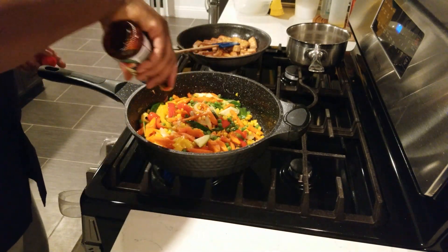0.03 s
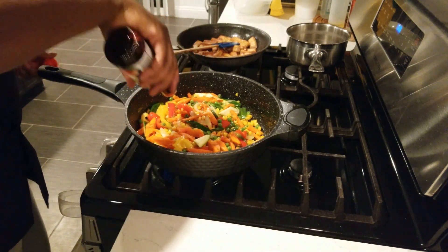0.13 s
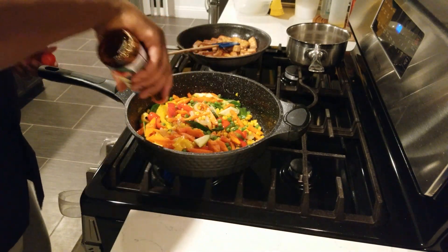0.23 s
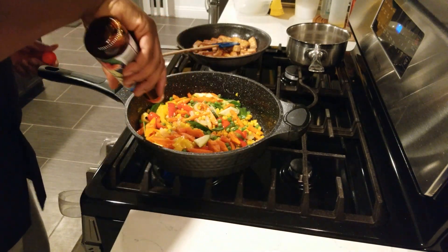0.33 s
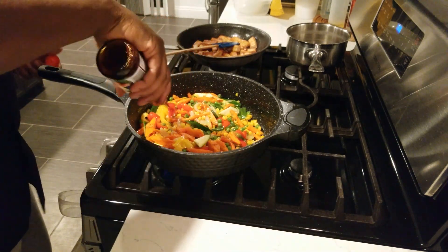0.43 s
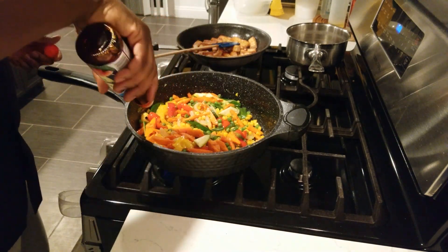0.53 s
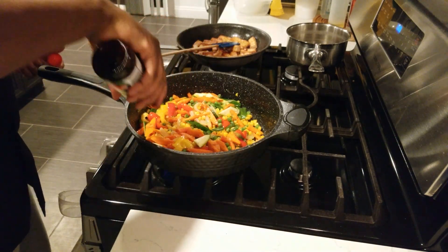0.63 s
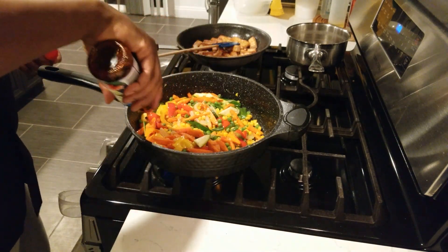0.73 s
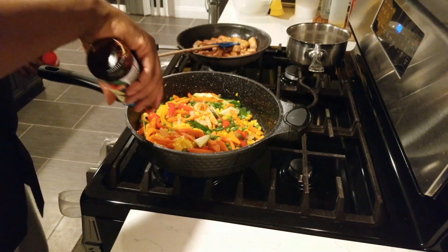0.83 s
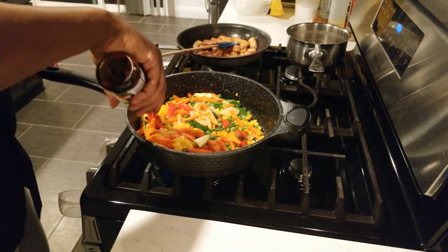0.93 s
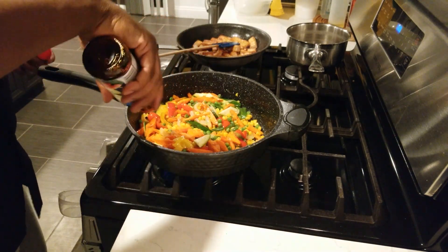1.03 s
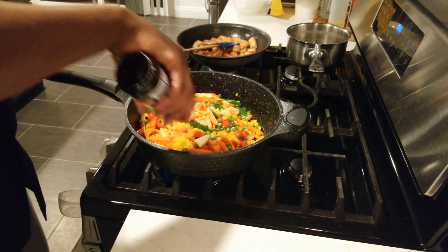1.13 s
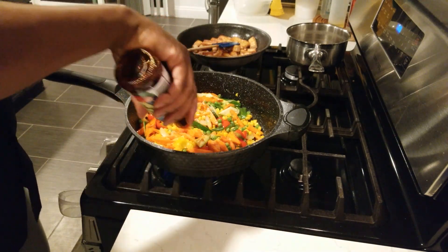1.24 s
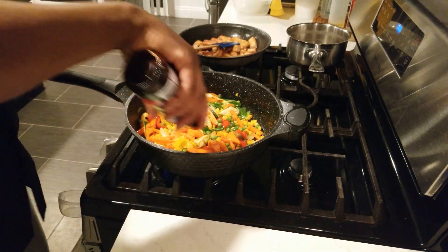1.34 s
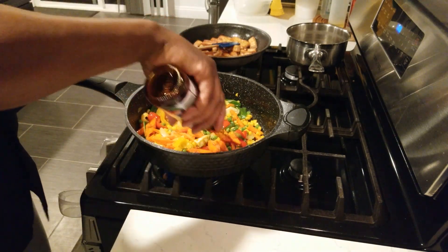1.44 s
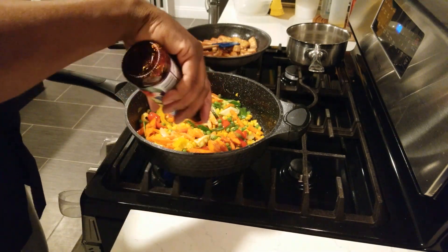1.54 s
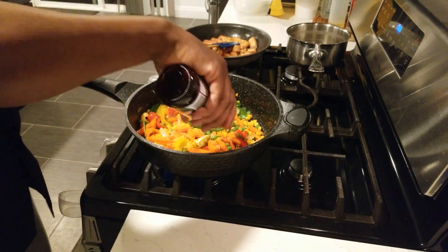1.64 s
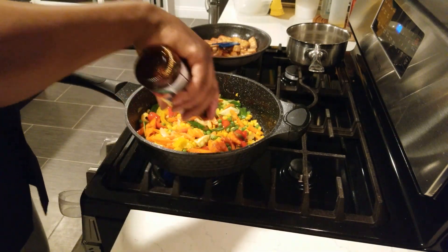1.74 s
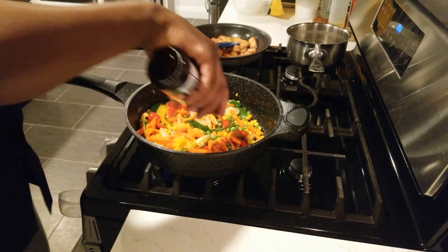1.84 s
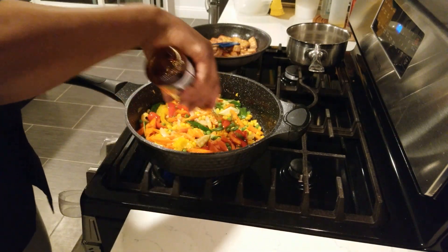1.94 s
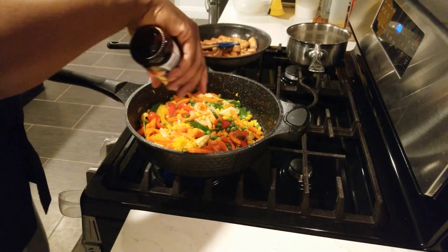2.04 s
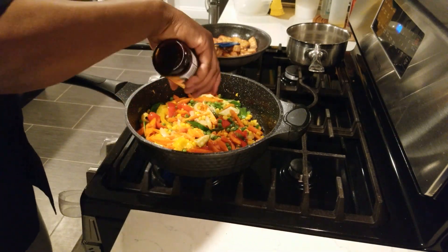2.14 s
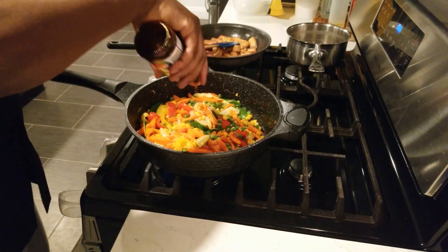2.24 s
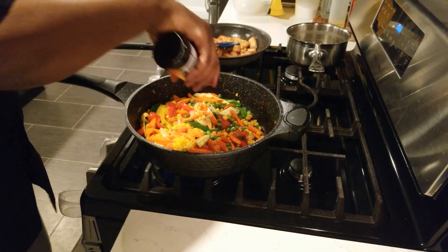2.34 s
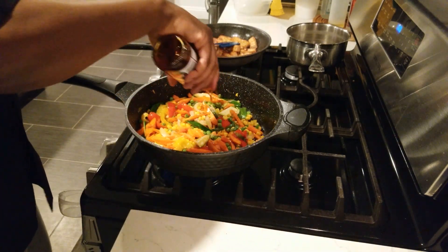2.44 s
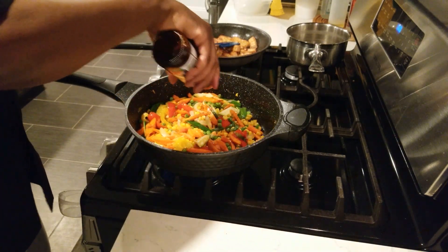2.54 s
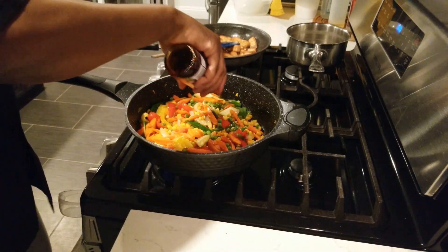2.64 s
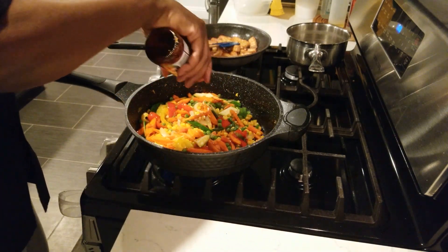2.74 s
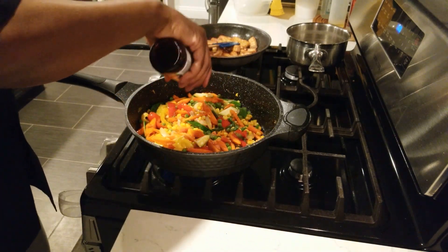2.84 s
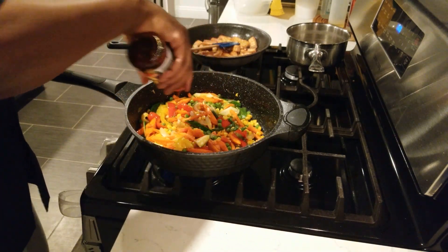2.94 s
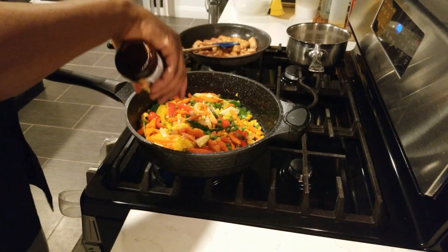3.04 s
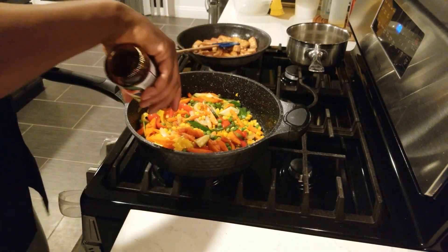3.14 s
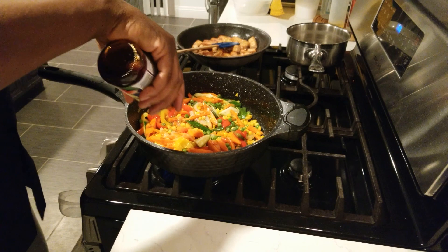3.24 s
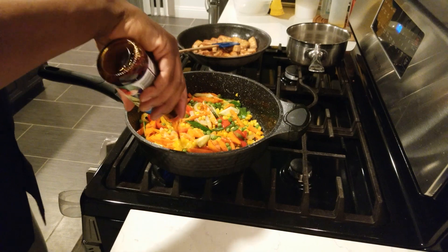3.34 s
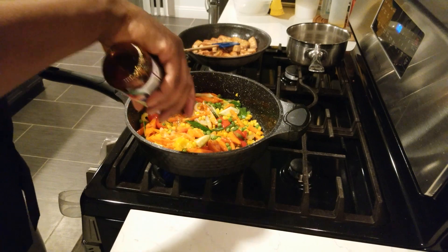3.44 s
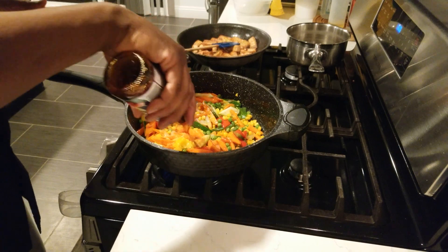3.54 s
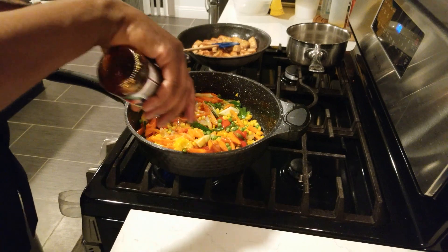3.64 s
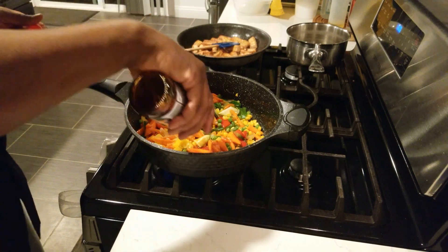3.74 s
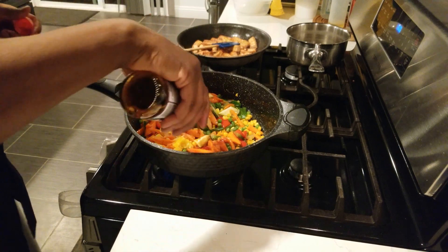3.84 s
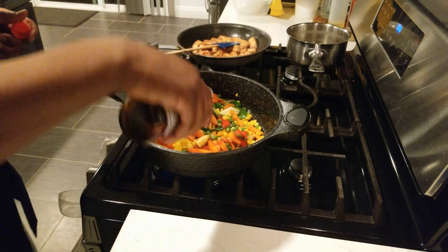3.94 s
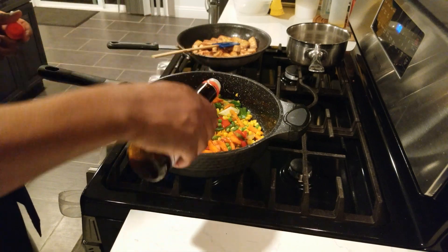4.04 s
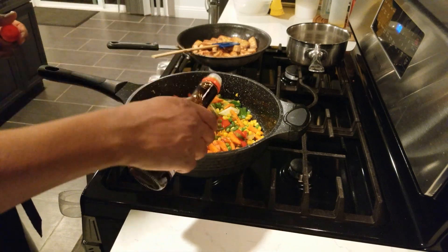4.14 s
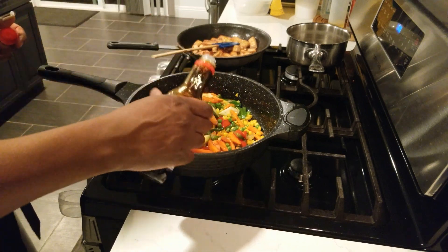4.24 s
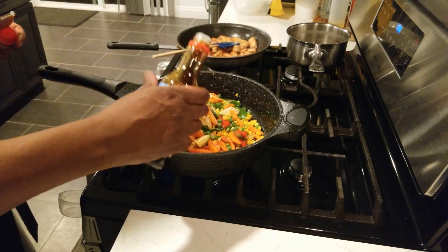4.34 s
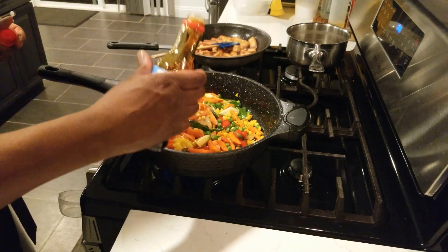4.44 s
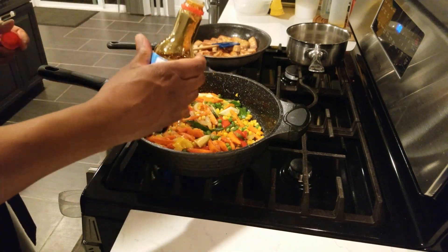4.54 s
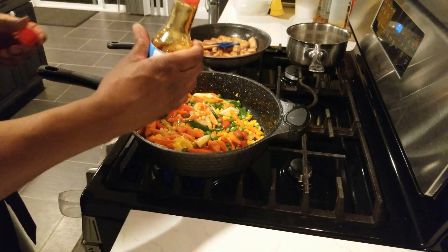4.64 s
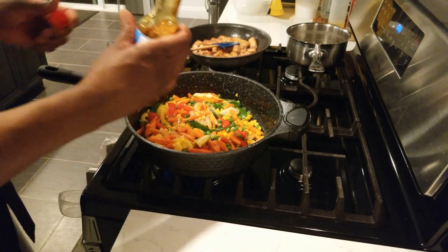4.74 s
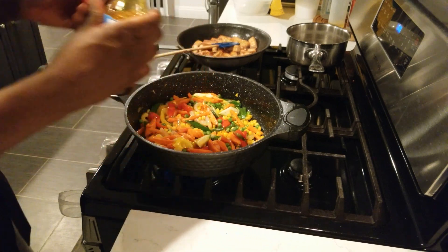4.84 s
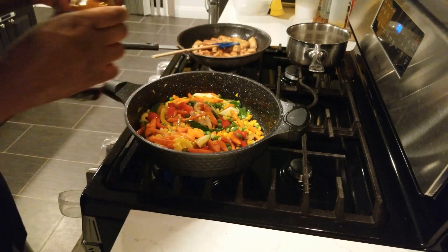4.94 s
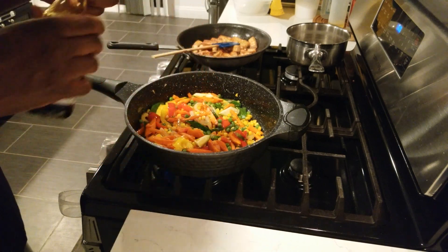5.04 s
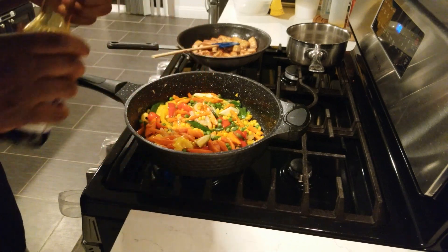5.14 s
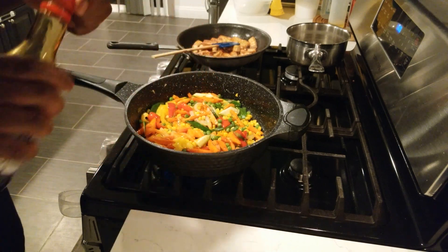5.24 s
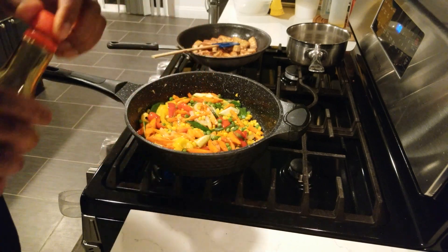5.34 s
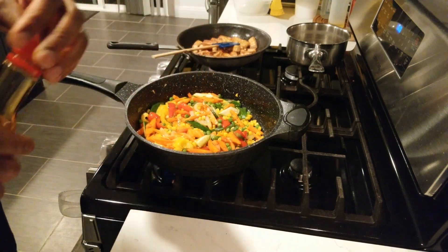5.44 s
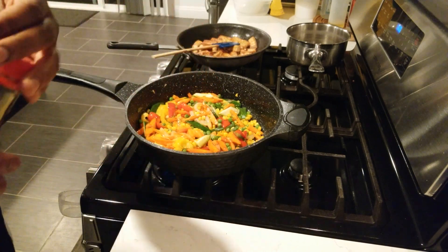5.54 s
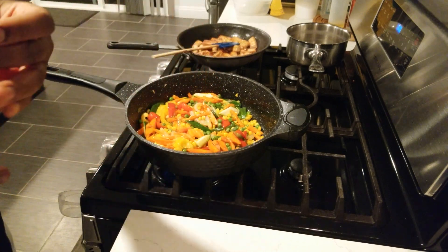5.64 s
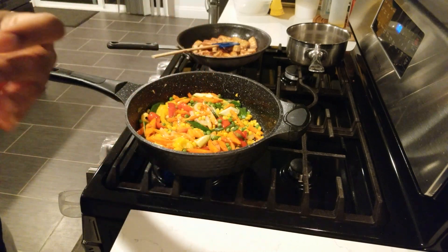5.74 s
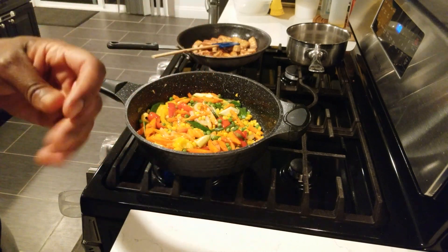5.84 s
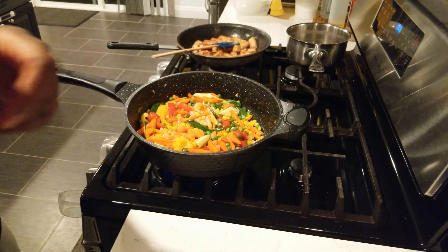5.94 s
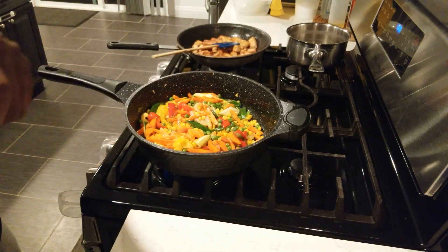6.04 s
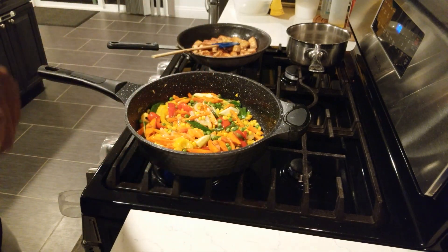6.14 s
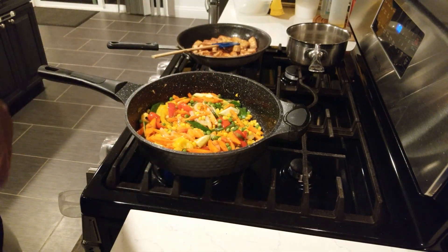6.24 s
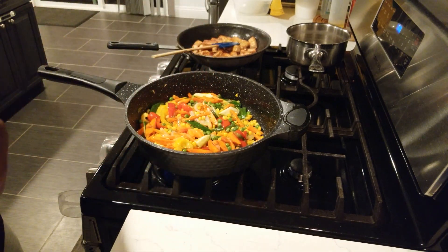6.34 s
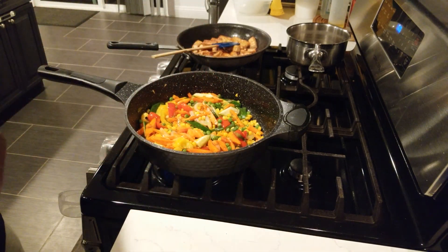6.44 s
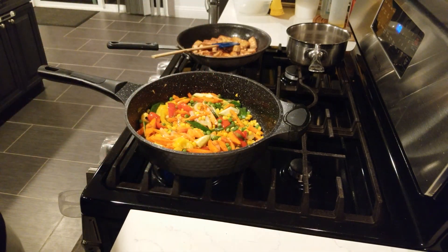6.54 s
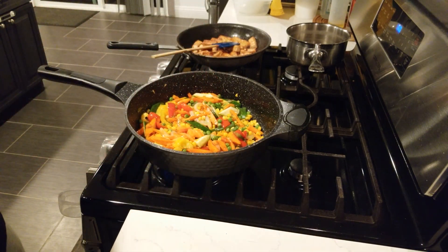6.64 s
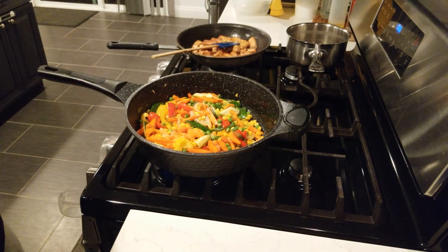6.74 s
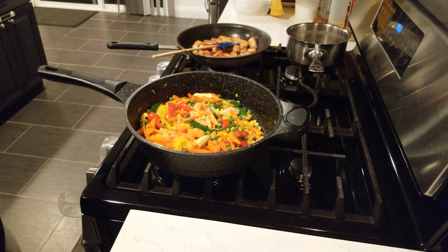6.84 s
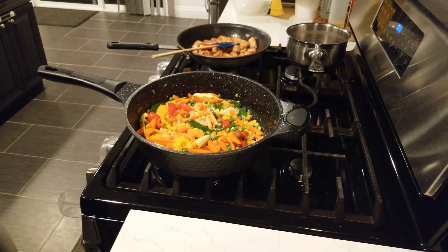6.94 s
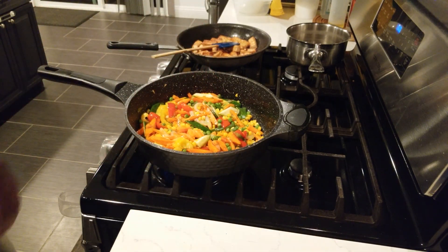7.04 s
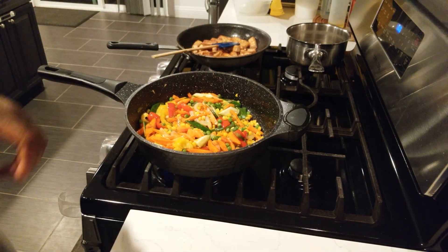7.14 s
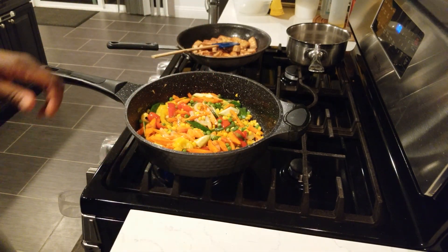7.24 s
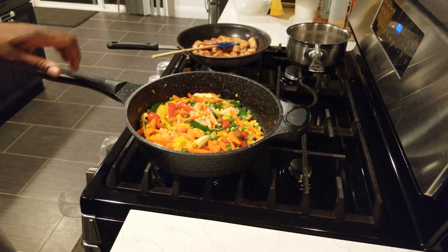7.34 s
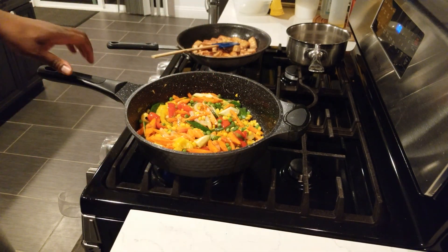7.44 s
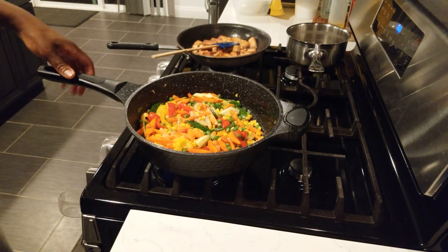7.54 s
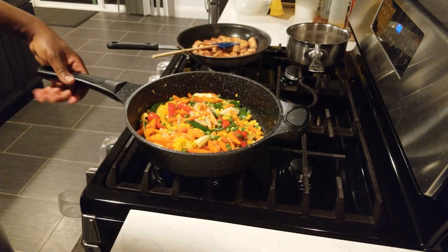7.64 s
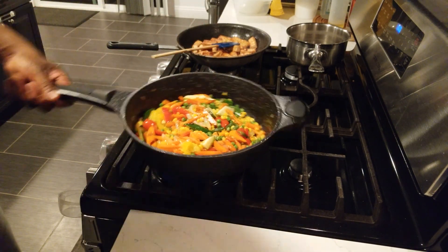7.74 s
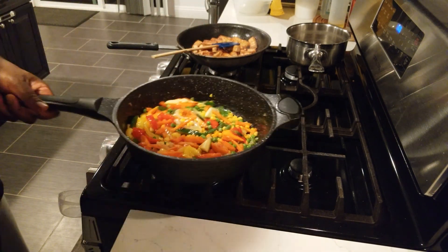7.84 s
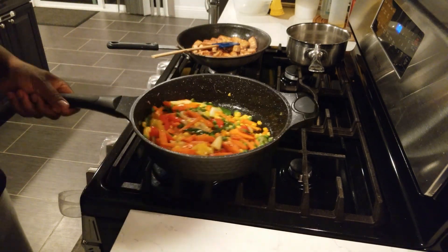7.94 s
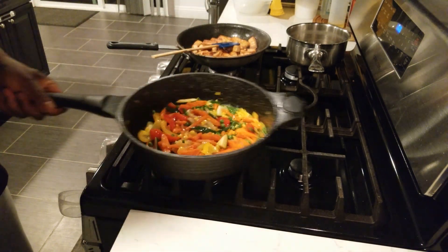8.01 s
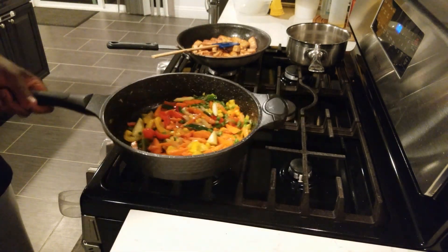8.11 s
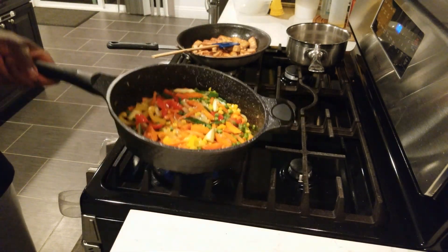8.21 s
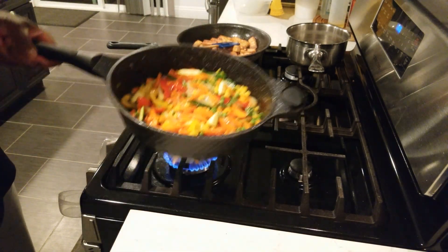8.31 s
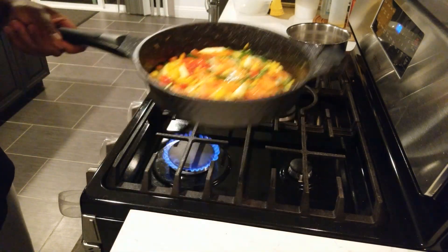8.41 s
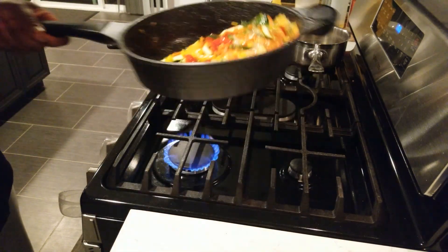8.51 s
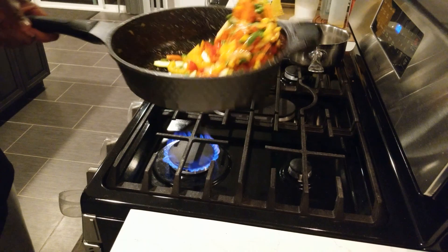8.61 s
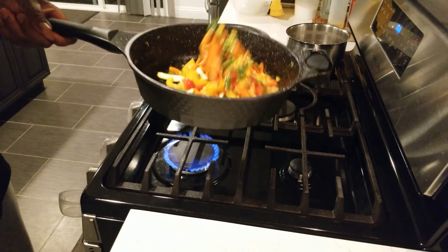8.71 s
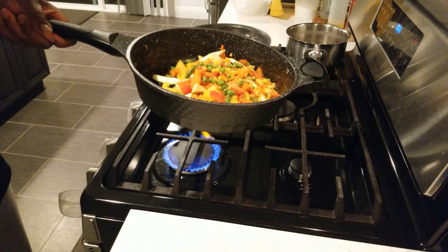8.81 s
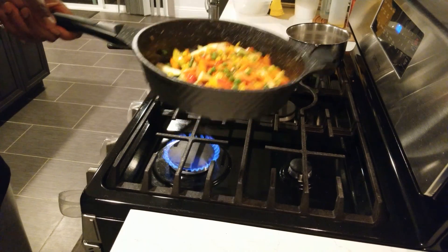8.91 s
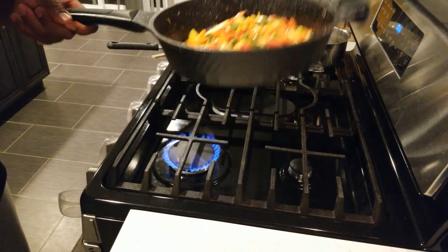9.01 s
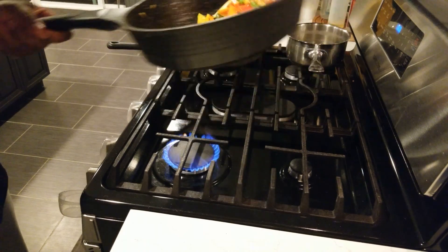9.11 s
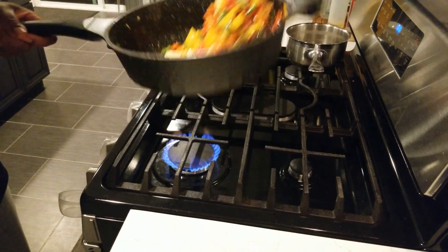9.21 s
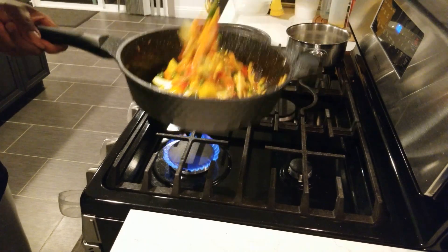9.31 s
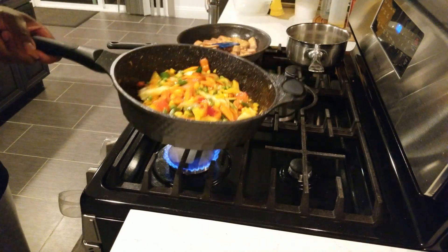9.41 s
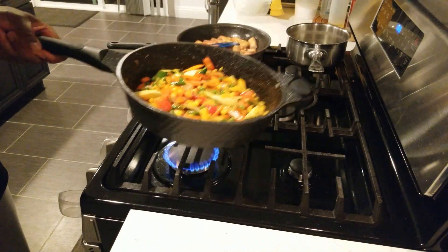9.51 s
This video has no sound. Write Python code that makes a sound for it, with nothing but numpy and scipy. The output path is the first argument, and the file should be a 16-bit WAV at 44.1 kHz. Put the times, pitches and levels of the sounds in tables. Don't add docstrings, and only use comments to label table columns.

```python
import sys
import numpy as np
from scipy import signal
from scipy.fft import rfft, irfft, next_fast_len
from scipy.io import wavfile
from scipy.ndimage import uniform_filter1d

SR = 44100
rng = np.random.default_rng(int(sys.argv[2]) if len(sys.argv) > 2 else 0)


def unload_wav(signal):
    wavfile.write(
        sys.argv[1],
        SR,
        np.round(np.clip(np.atleast_2d(signal).T, -1, 1) * 32767).astype(np.int16),
    )


def voltage_ratio(level):
    return 10 ** (np.asarray(level, float) / 20)


N = 422037
TIME = np.arange(N) / SR
LEAD_S = 0.000083


def boil():
    # (frequency [Hz], level [dB per Hz])
    bubble_color = [(88, -34), (150, -16), (201, -26), (283, -17.5), (330, -26), (412, -18.5), (481, -21.5),
                    (751, -13.5), (876, -11), (1410, -4.5), (1570, -1.5), (2530, 2), (2760, -2),
                    (5670, -8.5), (9000, -24.5), (11700, -52), (19800, -120)]
    # (frequency [Hz], width [Hz], lift [dB])
    bowl_air = [(400, 63, 4), (600, 40, 8.5), (760, 46, 5.5), (1008, 200, 2), (1490, 91, -1), (1540, 73, 1),
                (2080, 530, 0), (2400, 130, 1)]

    def lift_db(hz):
        return sum(db / (1 + (2 * (hz - f) / width) ** 2) for f, width, db in bowl_air)

    x = bursting(low_hz=493.4, high_hz=6990, per_s=3000., cycles=7.476, spread_db=3.0, share=0.21)
    x = seething(x, patchy_db=0.62, flicker_db=0.42, surge_db=0.53)
    x = echoed(x, wet_db=-5.5)
    x = filtered(x, lambda hz: voltage_ratio(read(bubble_color, hz) + lift_db(hz)))
    x = evened(ports(*x))
    heat = heat_db()
    big = filtered(x, lambda hz: 1 / (1 + (hz / 1350) ** 8))
    big_db = -2 + 0.42 * TIME - 0.21 * heat
    x = x + big * (voltage_ratio(big_db) - 1)
    return x * voltage_ratio(-29.5 + heat)


def spit():
    # (frequency [Hz], level [dB per Hz])
    spit_color = [(1500, -26.5), (3000, 2.5), (5500, 0.5), (7000, -2), (8800, -10.5), (10000, -8),
                  (12200, -1.5), (14000, -5), (15900, -7)]
    wet_from_s, wet_db_per_s = 3.47, -0.75
    bared_s, bared_db = 8.34, 5.5
    heat_share = 0.56

    x = bursting(low_hz=3005, high_hz=17100, per_s=5000., cycles=3.75, spread_db=1.0, share=0.4)
    x = seething(x, patchy_db=1.46, flicker_db=0.55, surge_db=.5)
    x = echoed(x, wet_db=-13.5)
    x = filtered(x, lambda hz: voltage_ratio(read(spit_color, hz)))
    smothered_db = wet_db_per_s * (np.clip(TIME, wet_from_s, bared_s) - wet_from_s)
    revived_db = bared_db * np.clip((TIME - bared_s) / .15, 0, 1)
    return evened(ports(*x)) * voltage_ratio(-32 + heat_share * heat_db() + smothered_db + revived_db)


def heat_db():
    # (time [s], level under full boil [dB])
    heat = [(0.0, -12), (0.3, -11.5), (0.67, -7.5), (1.04, -4), (1.5, -2), (2.05, -0.2), (3.7, -0.2),
            (7.1, -0.8), (7.7, -2.5), (8.0, 0.5), (8.15, -5), (8.45, -9), (8.7, -14), (9.03, -12),
            (9.35, -15.5), (9.57, -13)]
    # (time [s], dip [dB])
    tosses = [
        (8.57, -4),
        (9.16, -7),
    ]
    airborne_s = 0.085
    dips = sum(db * np.exp(-((TIME - s) / airborne_s) ** 2) for s, db in tosses)
    return np.interp(TIME, *np.transpose(heat)) + dips


def bursting(low_hz, high_hz, per_s, cycles, spread_db, share, count=14):
    pops = np.zeros((2, N))
    train = clicks(per_s, spread_db)
    size = rng.integers(0, count, N)
    for k, hz in enumerate(np.geomspace(low_hz, high_hz, count)):
        u = np.arange(round(5 * cycles * SR / hz)) / SR * hz / cycles - rng.random((2, 1))
        shape = np.where(u > 0, np.sqrt(abs(u)) * np.exp(-2.5 * u), 0)
        pop = shape * np.sin(2 * np.pi * cycles * (u + 0.096 * u ** 2))
        pop = np.sqrt(hz) * pop / np.linalg.norm(pop[0])
        pops += signal.oaconvolve((train * (size == k))[None], pop, axes=1)[:, :N]
    covered = np.clip((high_hz - low_hz) / (SR / 2), 0, 1)
    share = np.clip(share, 0, 1)
    hiss = rng.standard_normal((2, N))
    return np.sqrt(share * covered) * evened(pops) + np.sqrt(1 - share) * hiss


def seething(x, patchy_db, flicker_db, surge_db):
    hz, t, z = signal.stft(x, SR, nperseg=256, noverlap=192)
    patches = uniform_filter1d(rng.standard_normal((len(t), len(hz))).T, size=4, axis=0)
    patches = evened(uniform_filter1d(patches, size=40, axis=1))
    flicker = evened(uniform_filter1d(rng.standard_normal(len(t)), size=12))
    surge = uniform_filter1d(rng.standard_normal(len(t)), size=60)
    surge = evened(uniform_filter1d(surge, size=40))
    field = voltage_ratio(patchy_db * patches + flicker_db * flicker + surge_db * surge)
    return signal.istft(z * field, SR, nperseg=256, noverlap=192)[1][..., :N]


def pan_on_grate():
    out = pan_blows() + pan_dragging()
    # (frequency [Hz], level [dB], time to fall 60 dB [s])
    bar_modes = [(296, 0, 1.5), (212, -7, .9)]
    add(out, 8.135, voltage_ratio(-39) * ring(bar_modes, size=SR))
    return out


def pan_blows():
    # (time [s], peak [dB], softness [ms], chatter length [s], crack [dB])
    blows = [
        (7.855, -7.5, 0.67, 0.014, -29),
        (7.902, -7.5, 0.15, 0.014, -17),
        (7.916, -18, 0.2, 0.0066, -22),
        (7.919, -11, 0.71, 0.0075, -21),
        (7.925, -20.5, .1, 0.022, -20.5),
        (7.992, -16, .1, 0.013, -15),
        (8.011, -15, 0.24, 0.021, -37),
        (8.047, -21.5, 0.35, 0.008, -26),
        (8.133, -17.5, 0.82, 0.022, -34),
        (8.159, -33, .3, 0.02, -29),
    ]
    # (frequency [Hz], level [dB per Hz])
    crack_color = [(200, -18), (1000, -4), (2500, 7), (4200, -10), (5500, 4), (7200, -1.5), (8800, -11),
                   (10000, -5), (12000, -10), (16000, -31)]
    out, cracks = np.zeros(N), np.zeros(N)
    stove = stove_ring()
    t = np.arange(5000) / SR
    for s, db, softness_ms, chatter_s, crack_db in blows:
        chance = rng.standard_normal((2, len(t)))
        fade = np.exp(-t / chatter_s)
        bounces = 0.2 * chance[0] * (abs(chance[0]) > 2.3) * fade
        bounces[0] = 1
        force = np.convolve(bounces, blow(softness_ms))
        add(out, s, voltage_ratio(db) * signal.fftconvolve(force, pan_ring(spot_db=1.4)))
        add(out, s, voltage_ratio(db - 16.5) * signal.fftconvolve(force, stove))
        add(cracks, s, voltage_ratio(crack_db) * chance[1] * (fade + 0.88 * np.exp(-t / 0.0024)))
    return out + filtered(cracks, lambda hz: voltage_ratio(read(crack_color, hz)))


def pan_dragging():
    # (time [s], stove boom [dB], pan rubbing [dB])
    jerks = [
        (7.757, -39.5, -37),
        (7.772, -38, -37.5),
        (7.82, -35.5, -48),
        (7.858, -28, -27),
        (7.905, -28.5, -28),
        (7.95, -43, -34),
        (7.994, -41, -24.5),
        (8.135, -33, -42),
        (8.22, -43, -46),
    ]
    rise_s, boom_db_per_s, rub_db_per_s = 0.0056, -72, -120
    s, boom_db, rub_db = np.transpose(jerks)
    quick = voltage_ratio(-60 * np.arange(SR // 5) / SR / 0.028)
    rub_sound = np.convolve(pan_ring() * quick, blow(0.47))
    boom_sound = stove_ring()[:len(quick)] * quick ** 0.45
    rubbed = signal.oaconvolve(clicks(per_s=2600.0, spread_db=2.5), rub_sound)[:N]
    boom = signal.oaconvolve(clicks(per_s=1900.0, spread_db=2.5), boom_sound)[:N]
    rubbed = evened(rubbed) * swells(s, rub_db, rise_s, rub_db_per_s)
    return rubbed + evened(boom) * swells(s, boom_db, rise_s, boom_db_per_s)


def pan_ring(spot_db=0):
    # (frequency [Hz], level [dB], time to fall 60 dB [s])
    pan_modes = [(570, -6, 0.072), (650, -7, 0.075), (760, -5.5, 0.043), (877, -7.5, 0.065),
                 (1020, -4.5, 0.043), (1204, -5.5, 0.049), (1364, -0.5, 0.026), (1557, -1, 0.051),
                 (1785, -3.5, 0.041), (1990, -8, .09), (2315, 1, 0.04), (2630, -12, 0.047),
                 (2870, -10, .05), (3320, -9, 0.042), (3730, -7, 0.043), (4640, -5, 0.039)]
    return ring(pan_modes, spot_db)


def stove_ring():
    # (frequency [Hz], level [dB], time to fall 60 dB [s])
    stove_modes = [(55, -27, .3), (103, -12, 0.44), (167.5, 1.5, 0.28), (236, -3, 0.33), (292.5, -1, 0.39),
                   (360, -6.5, 0.14), (420, -6, 0.29), (553, -7.5, 0.25)]
    return ring(stove_modes, size=SR)


def bottle():
    # (time [s], peak [dB], softness [ms])
    knocks = [
        (7.224, -7, 0.49),
        (7.231, -16, 0.46),
        (7.443, -21, 0.91),
        (7.449, -19, 0.43),
        (7.456, -21, 0.47),
        (7.46, -23, 0.54),
        (7.48, -35, .9),
        (7.51, -30, 1.3),
    ]
    # (frequency [Hz], level [dB], time to fall 60 dB [s])
    counter_modes = [(60, -15, .08), (97, -7, .12), (270, -2, 0.066), (372, -0.5, 0.089), (560, -3, 0.028),
                     (694, -3, 0.057), (890, 1.5, 0.046), (1100, -3.5, 0.031), (1386, -3, 0.038),
                     (1850, -14, .03), (2280, -16, .02)]
    # (time [s], level [dB], frequency [Hz])
    rocking = [
        (7.25, -38, 287),
        (7.31, -29, 271),
        (7.36, -34, 362),
        (7.4, -35, 378.4),
        (7.455, -24, 304),
        (7.49, -48, 322),
        (7.52, -43, 303.5),
        (7.6, -44, 320),
    ]
    out, t = np.zeros(N), np.arange(4000) / SR
    for s, db, softness_ms in knocks:
        knock = ring(counter_modes, spot_db=2.5)
        rattle = rng.standard_normal(len(t))
        rattle = rattle - uniform_filter1d(rattle, size=90)
        knock[:len(t)] += 1.05 * rattle * voltage_ratio(-60 * t / 0.059)
        add(out, s, voltage_ratio(db) * np.convolve(knock, blow(softness_ms)))
    s, db, hz = np.transpose(rocking)
    slow = uniform_filter1d(rng.standard_normal((2, N)), size=350)
    sway, wobble = evened(uniform_filter1d(slow, size=250))
    turns = np.cumsum(np.interp(TIME, s, hz) * (1 + 0.022 * sway)) / SR
    hum = np.sin(2 * np.pi * turns) * (1 + 0.53 * wobble)
    return out + hum * voltage_ratio(np.interp(TIME, s, db, -120, -120) - 5.0)


def glugs():
    # (time [s], peak [dB], frequency [Hz], length [s])
    bubbles = [(0.413, -63, 600, .02), (0.534, -40.5, 760, 0.02), (0.541, -50, 630, .02),
               (.692, -24, 3930, 0.0069), (.7088, -27, 5700, .0025), (.79, -47, 260, 0.025),
               (0.812, -47, 390, .03), (1.023, -49, 450, 0.018), (1.095, -44, 630, 0.024),
               (1.295, -50.5, 290, .03), (1.301, -46, 400, .03), (1.543, -46, 380, 0.028),
               (3.03, -54, 170, 0.033), (5.811, -46, 250, .02), (5.815, -46, 150, .03)]
    out = np.zeros(N)
    for s, db, hz, length in bubbles:
        u = np.linspace(0, 1, round(length * SR))
        turns = np.cumsum(hz * (0.957 + 0.18 * u)) / SR
        swell = np.sin(np.pi * u ** 0.44) ** 2
        add(out, s, voltage_ratio(db) * np.sin(2 * np.pi * turns) * swell)
    return out


def burner():
    # (frequency [Hz], level [dB per Hz])
    rumble_color = [(12, -46), (20, -24), (34, 4), (54, 0.5), (75, -5), (108, -5), (204, -23), (300, -16),
                    (390, -53), (660, -120)]
    # (time [s], level [dB])
    draught = [(0, -58), (1.8, -52.5), (3.7, -55), (4.4, -57.5), (7.6, -54.5), (8.7, -55.5), (9.2, -61)]
    # (time [s], level [dB])
    thumps = [
        (7.225, -37),
        (7.77, -43),
        (7.9, -32),
        (8.1, -37),
        (8.23, -36),
    ]
    x = filtered(rng.standard_normal((2, N)), lambda hz: voltage_ratio(read(rumble_color, hz)))
    gusts = uniform_filter1d(rng.standard_normal(N), size=6000)
    gusts = evened(uniform_filter1d(gusts, size=4000))
    flame = voltage_ratio(np.interp(TIME, *np.transpose(draught)) + 1.5 * gusts)
    shaking = swells(*np.transpose(thumps), rise_s=.015, db_per_s=-110)
    return evened(ports(*x)) * np.hypot(flame, shaking)


def far_pan():
    # (frequency [Hz], level [dB per Hz])
    simmer_color = [(150, -53), (250, -15.5), (711, -5.5), (865, -16), (1310, -3), (1620, -19), (1900, -5),
                    (2250, 2.5), (2750, -10), (5370, -16), (6260, -6), (7000, -8), (9100, -13),
                    (15400, -120)]
    x = seething(rng.standard_normal((2, N)), patchy_db=2.5, flicker_db=2.5, surge_db=-1.5)
    x = filtered(x, lambda hz: voltage_ratio(read(simmer_color, hz)))
    return evened(ports(*x)) * voltage_ratio(-49.5)


def echoed(x, wet_db):
    return x + voltage_ratio(wet_db) * signal.oaconvolve(x, tail(0.0015)[:, :SR // 5], axes=1)[:, :N]


def placed(x, left_db, lead_s, wet_db):
    delays = np.array([[0], [lead_s]])
    direct = filtered(np.array([x, x]), lambda hz: np.exp(-2j * np.pi * hz * delays))
    wet = signal.fftconvolve(x[None], tail(0.0032), axes=1)[:, :N]
    side = filtered(wet[0] - wet[1], lambda hz: 1 / (1 + (220 / (hz + 1)) ** 2))
    wet = (wet.sum(0) + np.array([side, -side])) / 2
    return direct * voltage_ratio(np.array([[left_db / 2], [-left_db / 2]])) + voltage_ratio(wet_db) * wet


def tail(start_s):
    # (frequency [Hz], time to fall 60 dB [s])
    kitchen = [(100, 0.17), (500, 0.45), (2000, 0.22), (8000, 0.19)]
    hz, t, z = signal.stft(rng.standard_normal((2, SR // 2)), SR, nperseg=256)
    fade = voltage_ratio(-60 * t / read(kitchen, hz)[:, None])
    y = signal.istft(z * fade, SR, nperseg=256)[1]
    y = y * (np.arange(y.shape[1]) > start_s * SR)
    return y / np.linalg.norm(y, axis=1, keepdims=True)


def ports(near, other):
    # (frequency [Hz], likeness [0 to 1])
    likeness = [(60, 0.94), (130, 0.83), (290, 0.67), (640, 0.65), (1410, 0.17), (2100, 0.7), (3100, 0.25),
                (6820, 0.038), (15000, 0.045)]
    # (frequency [Hz], difference [dB])
    tilt = [(60, -0.5), (180, 1.5), (550, 0), (1650, 0.5), (3500, -5.5), (9000, 5), (15000, -1.5)]

    def same(hz):
        return np.clip(read(likeness, hz), 0, 1)

    def right_gain(hz):
        return voltage_ratio(-read(tilt, hz) / 2)

    left = filtered(near, lambda hz: voltage_ratio(read(tilt, hz) / 2))
    shared = filtered(near, lambda hz: same(hz) * np.exp(-2j * np.pi * hz * LEAD_S) * right_gain(hz))
    own = filtered(other, lambda hz: np.sqrt(1 - same(hz) ** 2) * right_gain(hz))
    return np.array([left, shared + own])


def ring(modes, spot_db=0, size=SR // 5):
    t = np.arange(size) / SR
    y = np.zeros(size)
    for k, (hz, db, t60) in enumerate(modes):
        louder, sharper = rng.standard_normal(2)
        fade = voltage_ratio(db + spot_db * louder - 60 * t / t60)
        pitch = hz * (1 + 0.0063 * spot_db * sharper)
        y += (-1) ** k * fade * np.sin(2 * np.pi * pitch * t)
    return y / abs(y).max()


def blow(softness_ms):
    force = np.hanning(round(softness_ms * SR / 1000) + 3)
    return force / force.sum()


def clicks(per_s, spread_db):
    size = voltage_ratio(spread_db * np.minimum(rng.exponential(1, N), 5)) * rng.choice([-1., 1.], N)
    return evened(size * (rng.random(N) < per_s / SR))


def swells(starts, peaks_db, rise_s, db_per_s):
    since = np.maximum(TIME - np.asarray(starts)[:, None], 0)
    each = np.minimum(since / rise_s, 1) * voltage_ratio(np.asarray(peaks_db)[:, None] + db_per_s * since)
    return np.sqrt((each ** 2).sum(0))


def evened(x):
    return x / np.sqrt(np.mean(x ** 2) + 1e-20)


def read(points, hz):
    f, value = np.transpose(points)
    return np.interp(np.log(hz + 1), np.log(f + 1), value)


def add(mix, s, sound):
    part = mix[round(s * SR):][:len(sound)]
    part += sound[:len(part)]


def filtered(x, gain):
    size = next_fast_len(N + 8192)
    return irfft(rfft(x, size) * gain(np.fft.rfftfreq(size, 1 / SR)), size)[..., :N]


def scene():
    mix = boil() + spit()
    mix += placed(pan_on_grate(), left_db=1.0, lead_s=.00005, wet_db=-6.5)
    mix += placed(bottle(), left_db=-3.0, lead_s=LEAD_S, wet_db=-8.5)
    mix += placed(glugs(), left_db=3.0, lead_s=LEAD_S, wet_db=-9)
    return mix + burner() + far_pan()


def low_pass(x):
    return signal.sosfilt(signal.butter(12, 17030, fs=SR, output="sos"), x)


def record(dry):
    bass_cut = signal.butter(2, 42.3, "high", fs=SR, output="sos")
    heard = signal.sosfilt(bass_cut, dry)
    heard = filtered(heard, lambda hz: hz < 15860)
    return low_pass(heard)


dry = scene()
out = record(dry)
unload_wav(out)
```